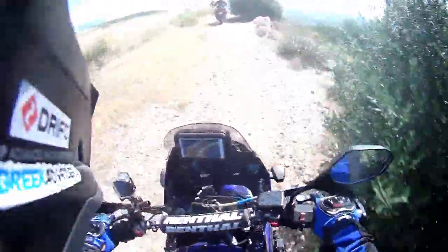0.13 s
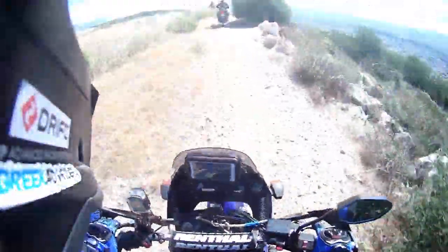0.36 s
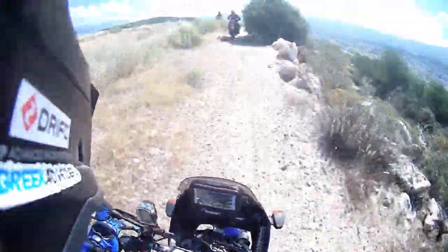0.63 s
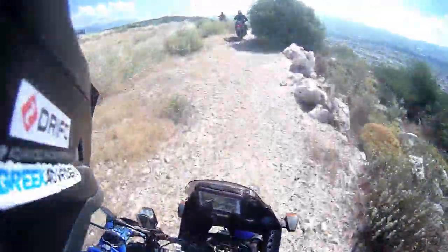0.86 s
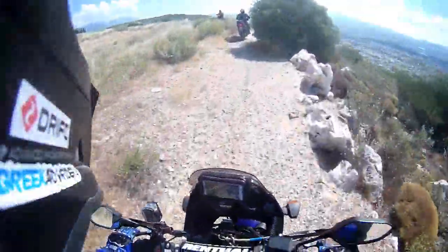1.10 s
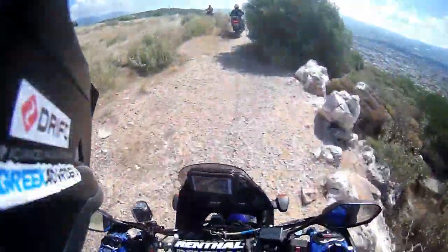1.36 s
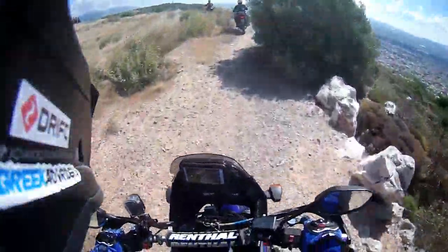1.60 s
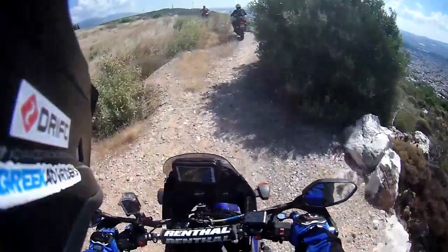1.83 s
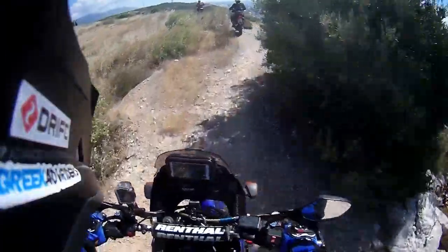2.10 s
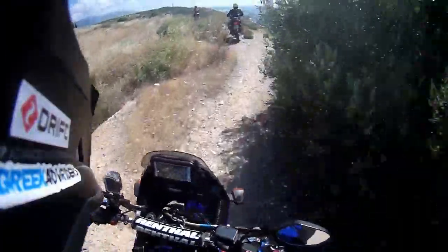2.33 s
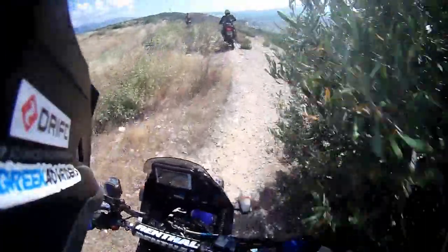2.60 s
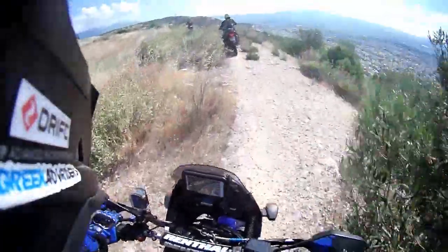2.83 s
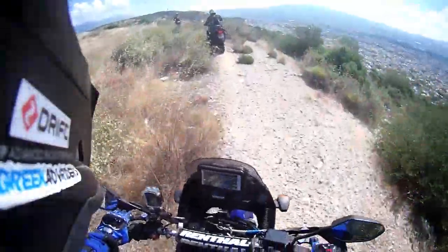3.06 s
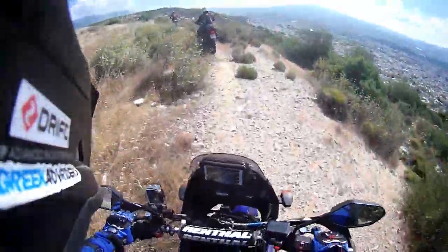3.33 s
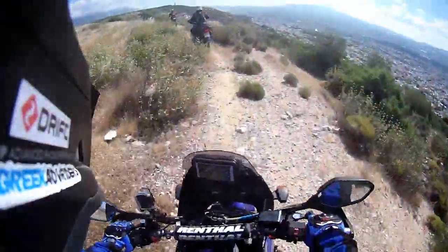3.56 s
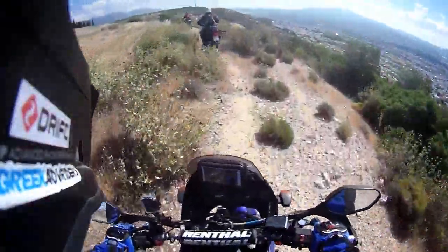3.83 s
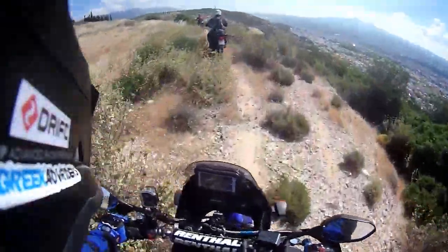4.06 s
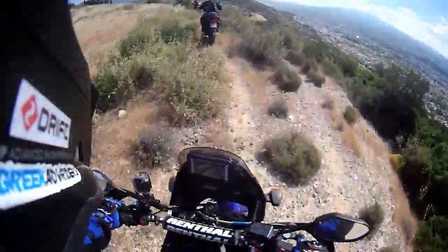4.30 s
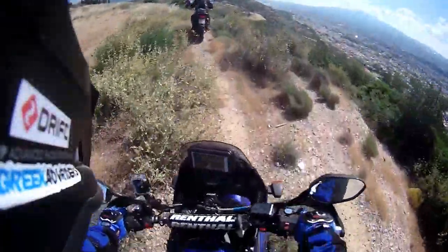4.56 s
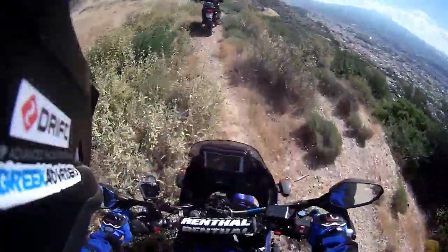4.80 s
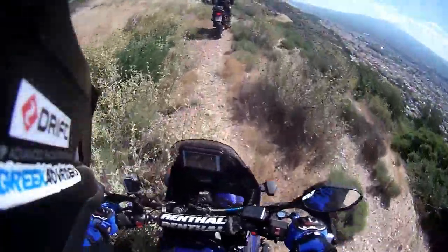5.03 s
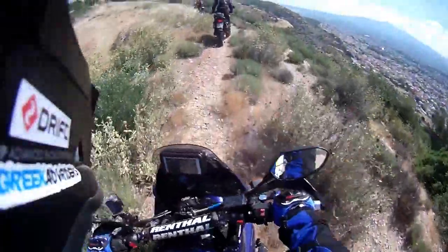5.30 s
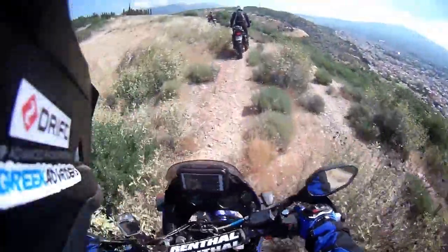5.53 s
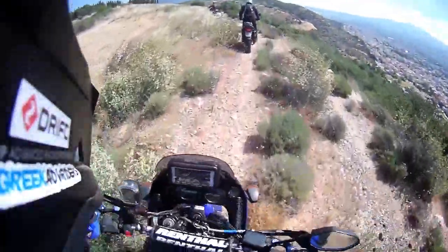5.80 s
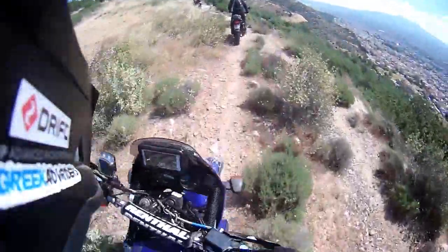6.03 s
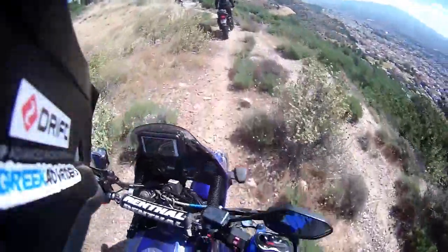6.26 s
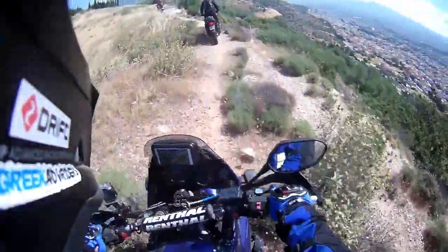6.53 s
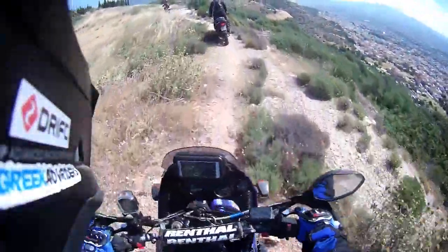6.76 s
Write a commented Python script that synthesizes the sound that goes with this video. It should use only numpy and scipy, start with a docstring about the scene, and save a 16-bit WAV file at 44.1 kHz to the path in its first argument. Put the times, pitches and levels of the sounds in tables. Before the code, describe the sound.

A single-cylinder motorcycle revs up briefly on a gravel trail, then drops to a slow uneven chug amid rattles, stone knocks and fluttering wind.

```python
"""A single-cylinder motorcycle on a gravel trail, heard by a small camera fixed to the rider's helmet.
The revs climb for a second; paired exhaust beats ring low resonances, under faint gear whine and whistles.
The throttle shuts: the second beat of each pair strays and turns uneven, and the revs sag to a slow chug.
At the very end the engine picks up again. All along, noise grains rattle through the camera housing,
splintery bursts make stones knock, and low coloured noise makes the wind flutter and swell."""
import sys
import numpy as np
from scipy import signal
from scipy.fft import rfft, irfft
from scipy.io import wavfile
from scipy.ndimage import uniform_filter1d

SR = 44100
rng = np.random.default_rng(int(sys.argv[2]) if len(sys.argv) > 2 else 0)


def nominal_scale(level):
    """Amplitude ratio for a level in decibels (scalar or array-like)."""
    x = np.asarray(level, float) / 20
    return 10 ** x


def dump(signal):
    """Clip the signal to [-1, 1] and save it as 16-bit WAV at the path in sys.argv[1]."""
    limited = np.clip(np.atleast_2d(signal).T, -1, 1)
    pcm = np.round(limited * 32767).astype(np.int16)
    wavfile.write(sys.argv[1], SR, pcm)


N = 303849
T = np.arange(N) / SR
GEAR_REVS = 15.0  # reference engine speed, cycles per s


def level(x, db):
    """Scale to an rms level."""
    return x * nominal_scale(db) / np.sqrt(np.mean(x ** 2))


def ring(x, hz, width):
    """One resonance, gain 1 at its centre."""
    return signal.lfilter(*signal.iirpeak(hz, hz / width, fs=SR), x)


def ring_twice(x, hz, width):
    """The same resonance acting twice, so a click swells before it dies."""
    return ring(ring(x, hz, width), hz, width)


def colour(points):
    """Noise with the spectrum of (Hz, dB) points, joined along log frequency."""
    hz, db = np.transpose(points)
    log_f = np.log(np.arange(N // 2 + 1) * SR / N + 1)
    return irfft(rfft(rng.standard_normal(N)) * nominal_scale(np.interp(log_f, np.log(hz), db)), N)


def walk(rate):
    """Random levels held 1 / rate s and smoothed twice over that time."""
    k = int(SR / rate)
    held = np.repeat(rng.standard_normal(N // k + 1), k)
    return 0.67 * uniform_filter1d(uniform_filter1d(held, k), k)[:N]


def swell(start, end):
    """Smooth rise and fall between two times."""
    return np.sin(np.pi * np.clip((T - start) / (end - start), 0, 1)) ** 0.5


def crank(revs):
    """Engine cycles done at each sample: the running sum of the speed."""
    start_cycle = 0.05
    return start_cycle + np.cumsum(revs) / SR


def valve(cycles, scatter_db, jitter_s):
    """One click each time a cycle is completed, a little uneven in size and time."""
    at = np.flatnonzero(np.diff(np.floor(cycles)) > 0)
    chance = rng.standard_normal((len(at), 2))
    shift = (jitter_s[at] * SR * chance[:, 0]).astype(int)
    clicks = np.zeros(N)
    clicks[np.clip(at + shift, 0, N - 1)] = nominal_scale(scatter_db[at] * chance[:, 1])
    return clicks


def beats(cycles, revs, beat_db, bite_db):
    """Two exhaust beats a cycle ring the pipe; each resonance acts twice, so a beat swells before it dies."""
    # what the beats ring: centre_hz, width_hz of each pass, relative level_db, sign
    pipe_modes = [(66, 52, -7, -0.44), (104.3, 65, -9, 0.89), (230.2, 41.4, 0.5, 0.99),
                  (280.45, 30.9, 5.5, -1.024), (322.2, 34.3, -9.5, 0.51), (447.5, 82, -24, -0.73),
                  (798, 130, -39, 1)]
    # second beat, displaced and less even while the throttle is shut:
    # time_s, lag in cycles, level_db against the first, timing scatter_s, size scatter_db
    second_beat = [(1.17, .243, -1.5, .0001, .6), (1.25, .34, -4, .0006, 2.5), (1.36, .46, -2, .0005, 2),
                   (1.5, .34, -4, .0004, 2), (1.7, .34, -4, .0004, 2), (1.85, .185, -3, .0003, 2),
                   (2.45, .185, -3, .0003, 2), (2.65, .243, -2.4, .0002, 2)]
    lead_s, top_hz = 0.0027, 355.0
    echo_s, echo_db = 0.0196, -9.0
    thump_db_per_octave = -34  # the two lowest resonances grow as the engine lugs below GEAR_REVS

    s, *columns = np.transpose(second_beat)
    lag, second_db, jitter_s, uneven_db = (np.interp(T, s, c) for c in columns)
    clicks = valve(cycles, scatter_db=0.3 * uneven_db, jitter_s=jitter_s)
    clicks = clicks + nominal_scale(second_db) * valve(cycles - lag, scatter_db=uneven_db, jitter_s=jitter_s)
    # wave back from the far end of the pipe
    clicks = clicks + nominal_scale(echo_db) * np.roll(clicks, int(echo_s * SR))

    rings = [sign * nominal_scale(db) * ring_twice(clicks, hz, w) for hz, w, db, sign in pipe_modes]
    thump_db = thump_db_per_octave * np.minimum(np.log2(revs / GEAR_REVS), 0)
    low = nominal_scale(thump_db) * sum(rings[:2]) + sum(rings[2:4])
    high = sum(rings[4:])
    silencer = signal.cheby1(4, 1, top_hz, fs=SR, output="sos")  # steep edge
    out = signal.sosfilt(silencer, low) + nominal_scale(bite_db) * high
    out = np.roll(out, -int(lead_s * SR))
    # hold the loudness of the beats apart from how often they come
    band = ring(out, 260.0, 110.0)
    return out * nominal_scale(beat_db) / np.sqrt(uniform_filter1d(band ** 2, size=SR // 3) + 1e-12)


def puff(cycles, bite_db):
    """Low puffs of gas: noise pulsing once a cycle through two broad resonances."""
    gas = rng.standard_normal(N) * np.exp(0.52 * np.cos(2 * np.pi * (cycles - 0.25)))
    breath = ring_twice(gas, 443.0, 290.0) + 0.31 * ring_twice(gas, 770.0, 290.0)
    return level(breath, -11.5) * nominal_scale(bite_db)


def housing(x, flicker_db=0):
    """Camera housing: neighbouring modes alternate in sign, leaving valleys between; loose parts flicker."""
    # modes rung by rattle and knocks: centre_hz, width_hz (each pass is 1.71 times as wide), level_db
    housing_modes = [(459, 70, -2), (740, 176, -8), (1080, 275, -15.5), (1266.6, 39.5, -1.5),
                     (1420, 85.5, -2), (1620, 119, -3.5), (2104, 280, -2.5), (2424, 122, -6),
                     (2690, 274, -7), (3412, 347, -13.5), (4080, 470, -22), (6000, 2500, -32)]
    out = np.zeros(N if flicker_db else len(x))
    for k, (hz, width, db) in enumerate(housing_modes):
        mode = (-1) ** k * nominal_scale(db) * ring_twice(x, hz, 1.71 * width)
        out += mode * nominal_scale(flicker_db * walk(35)) if flicker_db else mode
    return out


def rattle_level(revs, beat_db):
    """Steady gravel plus valve gear that grows with revs and with load, added as powers, in dB."""
    gravel_db = -59.5
    gear_db, load_db = -61.0, -44.0  # valve gear at GEAR_REVS and at this beat level
    gear_db = gear_db + 7.0 * np.log2(revs / GEAR_REVS) + 0.62 * (beat_db - load_db)
    return 10 * np.log10(nominal_scale(gear_db) ** 2 + nominal_scale(gravel_db) ** 2)


def rattle(cycles, bite_db, rattle_db):
    """Valve gear, chain and gravel: dense grains, fuller early in each cycle, over a low puff of gas."""
    sizes = nominal_scale(1.12 * rng.exponential(size=N))
    grains = rng.standard_normal(N) * sizes * (rng.random(N) < 0.3)
    throb_db = 0.79 * np.cos(2 * np.pi * (cycles - 0.22)) + 0.49 * walk(25) + 0.98 * walk(90)
    shaken = level(housing(grains * nominal_scale(throb_db), flicker_db=2.0), 0)
    return (shaken + puff(cycles, bite_db)) * nominal_scale(rattle_db)


def pebbles(count=36):
    """Many small hits at random moments, as rows like those of the listed knocks."""
    floor_db, spread_db, snap_db = -50.5, 1.5, -20.5  # snap against the body
    when, size, place, length = rng.random((count, 4)).T
    db = floor_db - spread_db * np.log(size)
    return list(zip(when * (N - 1) / SR, db, 1100.0 * 2 ** place, 0.0037 + 0.0068 * length, db + snap_db))


def knocks():
    """Each blow is a short dying burst of splinters, coloured by where it lands, with a thin bright snap."""
    # stones and twigs striking the frame: start_s, peak_db, centre_hz, decay length_s, bright snap_db
    blows = [(0.177, -37, 2450, 0.012, -69), (1.58, -42.5, 1250, 0.0041, -74),
             (1.667, -38, 1620, 0.017, -60), (2.683, -49, 1620, 0.019, -61),
             (2.715, -44.5, 1270, 0.009, -59), (2.761, -49, 1280, 0.014, -57),
             (2.995, -45, 1270, 0.011, -71), (3.539, -48.5, 1950, 0.011, -64),
             (3.754, -43, 2370, 0.006, -68), (3.974, -44, 2260, 0.006, -59),
             (4.063, -43.5, 2060, 0.015, -64), (5.331, -47, 1550, 0.028, -62),
             (5.368, -34.5, 2530, 0.013, -62), (5.493, -48, 1420, 0.006, -70),
             (5.541, -48, 2250, 0.006, -68), (5.675, -42.5, 1270, 0.008, -70),
             (5.843, -42.5, 1290, 0.0073, -72), (5.868, -43.5, 1490, 0.01, -61),
             (6.016, -45.5, 1400, 0.021, -62), (6.374, -49, 2040, 0.0058, -67),
             (6.493, -50, 1500, 0.0035, -66)]
    rise_s = 0.0035
    out = np.zeros(N)
    fade = np.arange(int(0.06 * SR)) / SR
    for s, db, hz, length, snap_db in blows + pebbles():
        envelope = np.exp(-fade / max(length, 0.001)) * np.minimum(fade / rise_s, 1)
        burst = rng.standard_normal(len(fade)) * envelope
        body = housing(0.9 * burst + ring(burst, hz, 0.23 * hz)) + 0.19 * ring(burst, 1000.0, 610.0)
        snap = ring_twice(burst, 5700.0, 3000.0)
        hit = body * nominal_scale(db) / np.abs(body).max() + snap * nominal_scale(snap_db) / np.abs(snap).max()
        i = int(s * SR)
        out[i:i + len(fade)] += hit[:N - i]
    return out


def wind():
    """Wind on the microphone: low buffeting noise that flutters."""
    # strength of the wind: time_s, level_db
    gusts = [(0.0, -31), (0.07, -38), (0.25, -39.5), (0.38, -38), (0.5, -38), (1.2, -39.5), (1.4, -37.5),
             (1.75, -36.5), (2.9, -39.5), (3.05, -43), (3.18, -37), (4.05, -38), (4.35, -34.5), (4.74, -38),
             (5.6, -40.5), (6.43, -41), (6.7, -33), (6.89, -39)]
    # colour of the wind: frequency_hz, density_db per Hz (relative)
    wind_spectrum = [(15, 0.5), (30, -2), (80, 1), (130, -4), (180, -13), (280, -17), (350, -34),
                     (700, -40.5), (1500, -95)]
    s, db = np.transpose(gusts)
    return level(colour(wind_spectrum), 0) * nominal_scale(np.interp(T, s, db) + walk(7.6))


def whine(cycles):
    """Gear whine: sines locked to the crank, so their pitch follows the revs, wavering in level."""
    # gears: teeth per cycle, start_s, end_s, level_db
    gears = [(32, 0., 1.25, -62.), (21.5, .55, 1.15, -64.), (46.5, 1.6, 2.08, -65.5)]
    return sum(nominal_scale(db + 2.5 * walk(14)) * swell(a, b) * np.sin(2 * np.pi * teeth * cycles)
               for teeth, a, b, db in gears)


def whistle():
    """Thin whistles under load: sines that hold their pitch and waver in level."""
    # whistles: pitch_hz, start_s, end_s, level_db
    whistles = [(2620, .1, .4, -53.5), (4120, .25, .48, -72.), (2770, .38, .52, -62.)]
    return sum(nominal_scale(db + 2 * walk(33)) * swell(a, b) * np.sin(2 * np.pi * hz * T)
               for hz, a, b, db in whistles)


def scene():
    """Engine, rattle, knocks, wind and faint tones, all at the helmet."""
    # engine speed: time_s, four-stroke cycles per s
    rev_curve = [(0.0, 22.16), (0.25, 25.33), (0.68, 25.79), (1.03, 27.51), (1.36, 23.88), (1.49, 21.52),
                 (2.08, 16.05), (3.03, 14.62), (3.24, 14.94), (3.4, 13.97), (4.3, 12.87), (4.67, 13.48),
                 (5.35, 12.3), (5.54, 14.19), (5.95, 10.65), (6.18, 11.4), (6.31, 10.64), (6.9, 14.21)]
    # load on the engine, as the level of the beats: time_s, level_db
    load_curve = [(0.05, -34), (0.25, -34), (0.42, -36), (0.56, -38.5), (1.12, -39), (1.25, -42),
                  (1.6, -40), (2.3, -43.5), (3.0, -43.5), (3.55, -42), (4.15, -43), (5.0, -43),
                  (5.22, -46.5), (5.6, -41), (5.85, -48), (6.3, -47), (6.56, -44.5), (6.84, -40)]
    # upper ring of the beats and their puff of gas: time_s, gain_db
    bite_curve = [(0, 0), (.5, 0.5), (1.15, 4), (1.3, 4), (2.2, -0.5), (3, -6), (5, -4), (6.9, 3)]
    revs = np.interp(T, *np.transpose(rev_curve))
    beat_db = np.interp(T, *np.transpose(load_curve))
    bite_db = np.interp(T, *np.transpose(bite_curve))
    cycles = crank(revs)
    engine = beats(cycles, revs, beat_db, bite_db) + whine(cycles) + whistle()
    rattling = rattle(cycles, bite_db, rattle_level(revs, beat_db))
    return (engine + rattling + knocks() + wind())[None]


def low_pass(x):
    """Removes everything above the highest recorded frequency."""
    return signal.sosfilt(signal.butter(12, 15740, fs=SR, output="sos"), x)


def record(dry):
    """The covered microphone port cuts steeply above its edge; the camera adds a faint white hiss."""
    port_hz, hiss_db = 7300.0, -76.5
    port = signal.sosfilt(signal.butter(6, port_hz, fs=SR, output="sos"), dry)
    hiss = nominal_scale(hiss_db) * rng.standard_normal(N)
    return low_pass(port + hiss)


dry = scene()
out = record(dry)
dump(out)
```